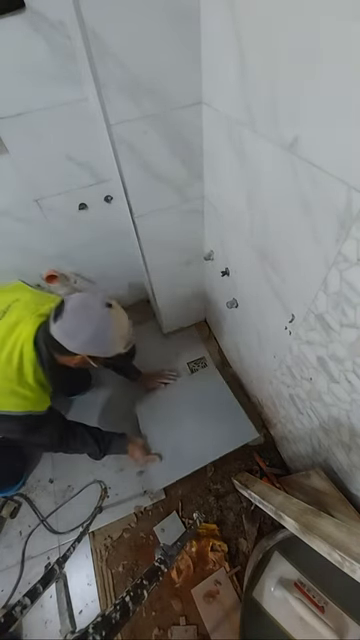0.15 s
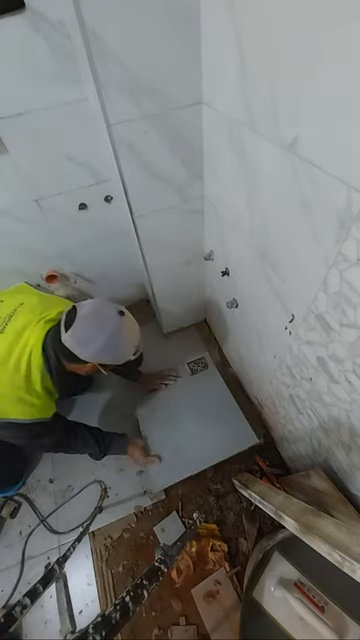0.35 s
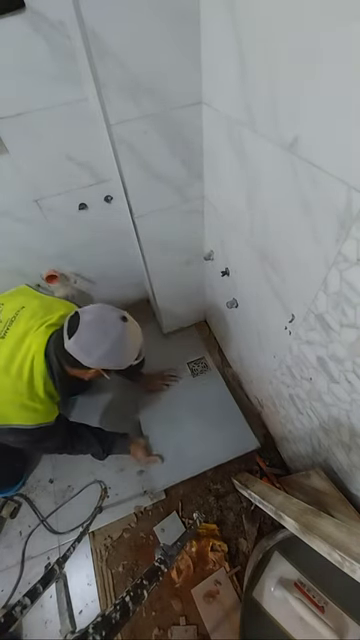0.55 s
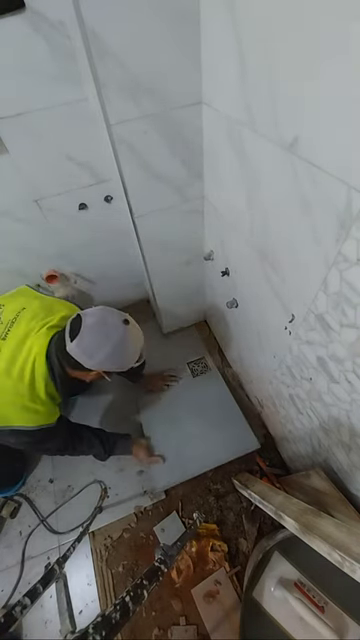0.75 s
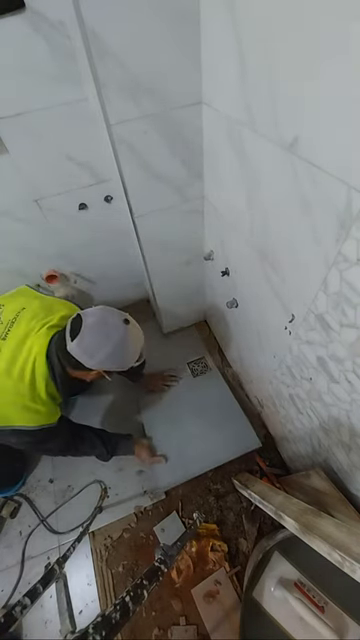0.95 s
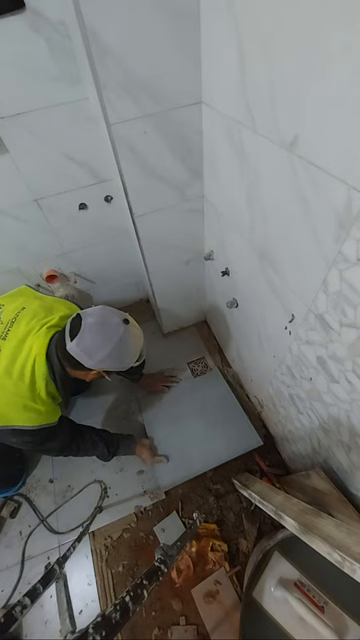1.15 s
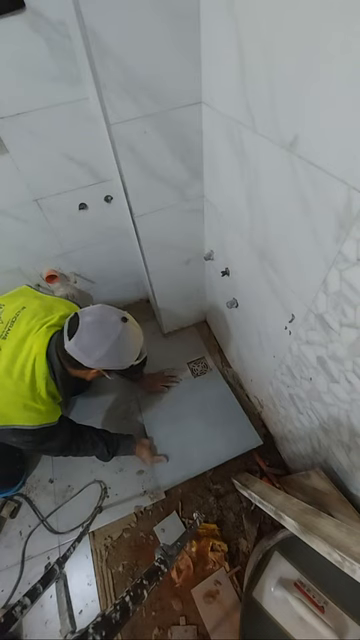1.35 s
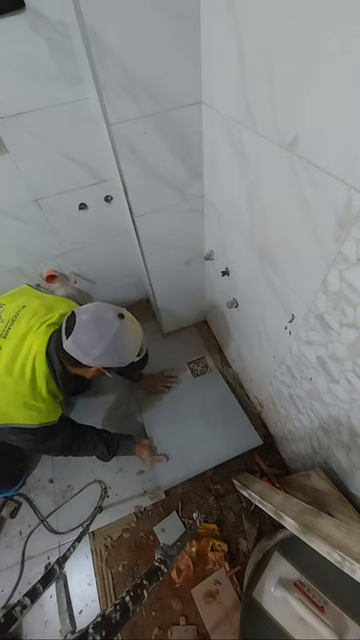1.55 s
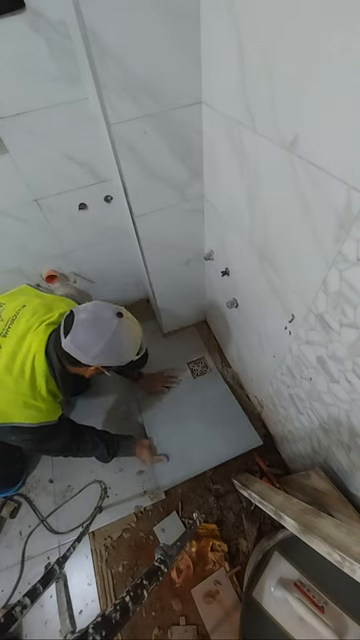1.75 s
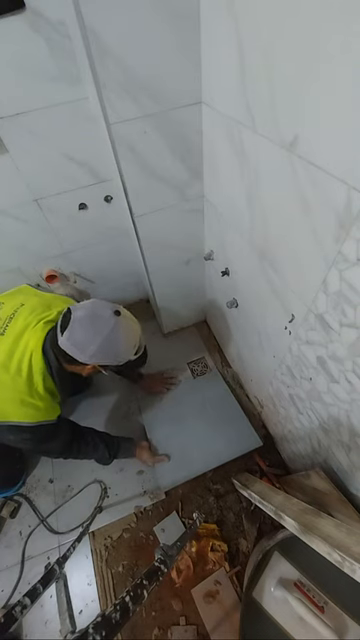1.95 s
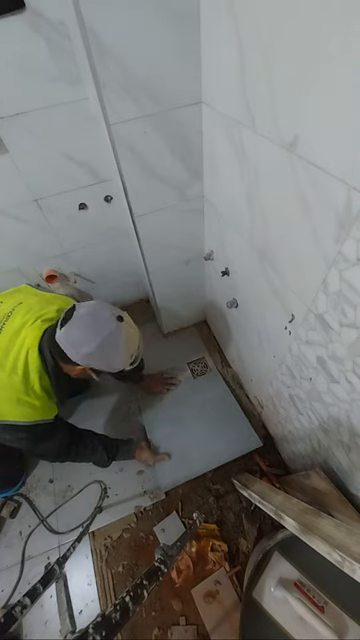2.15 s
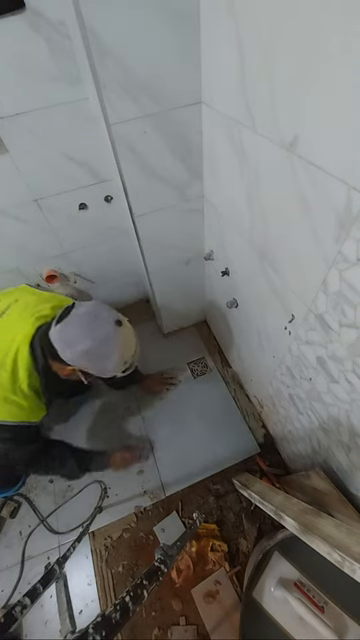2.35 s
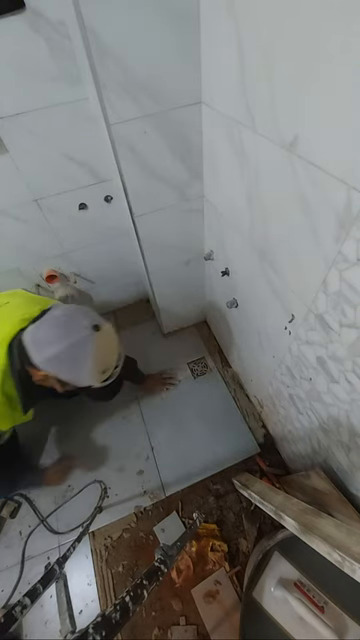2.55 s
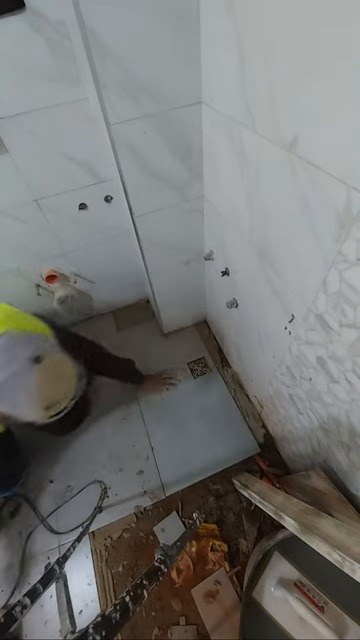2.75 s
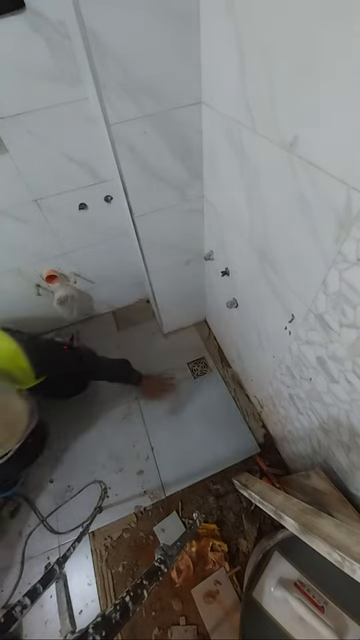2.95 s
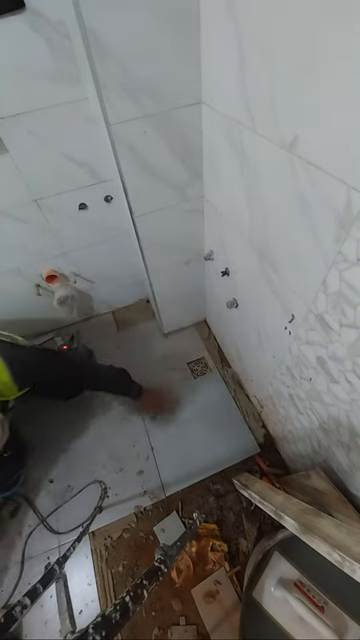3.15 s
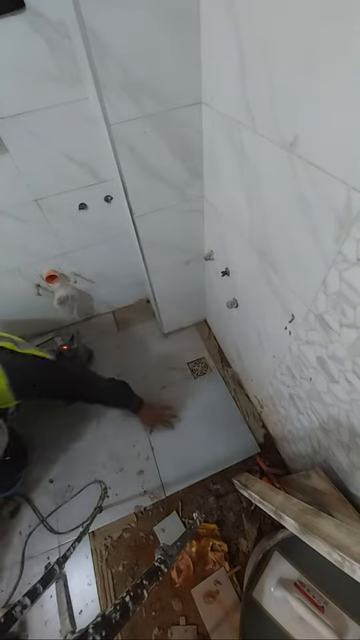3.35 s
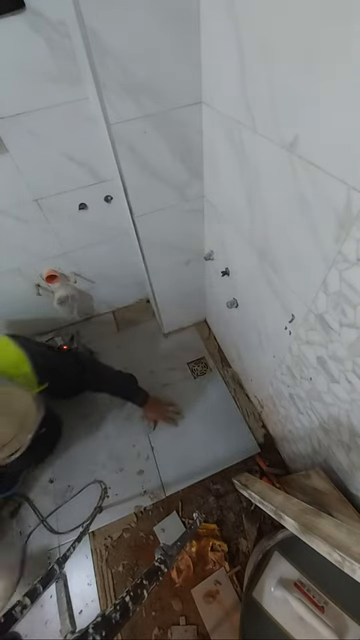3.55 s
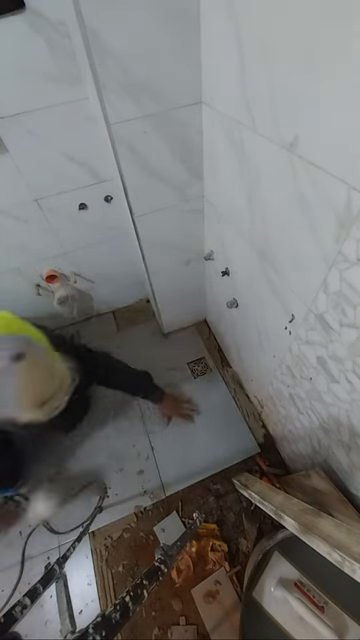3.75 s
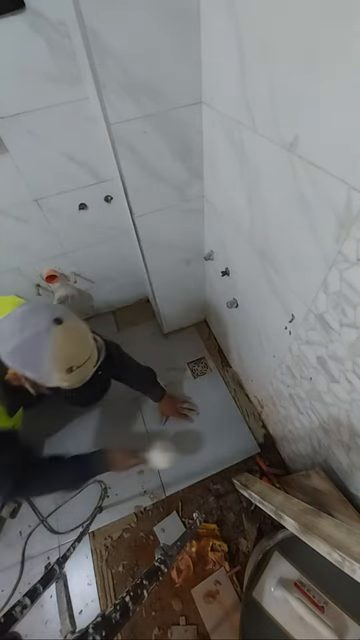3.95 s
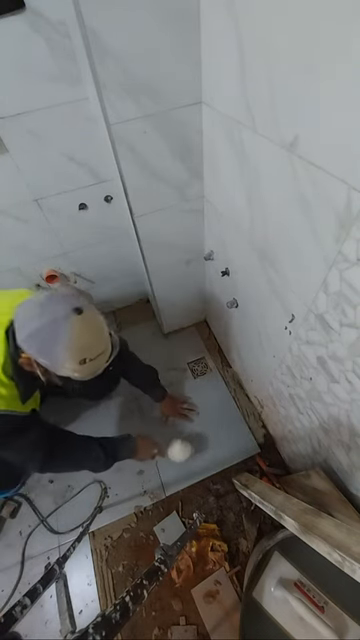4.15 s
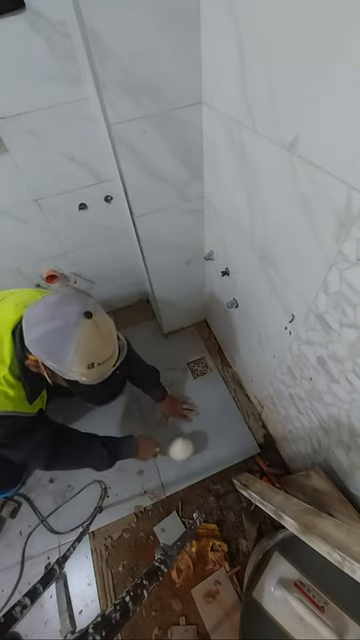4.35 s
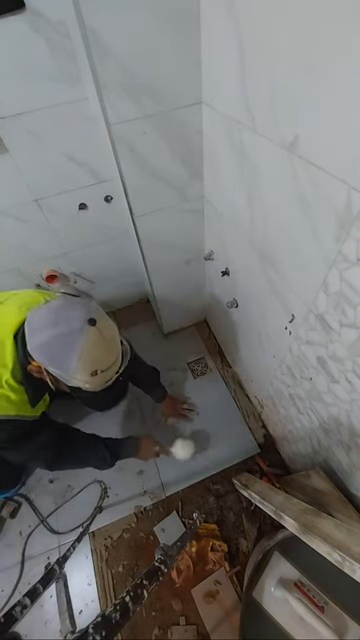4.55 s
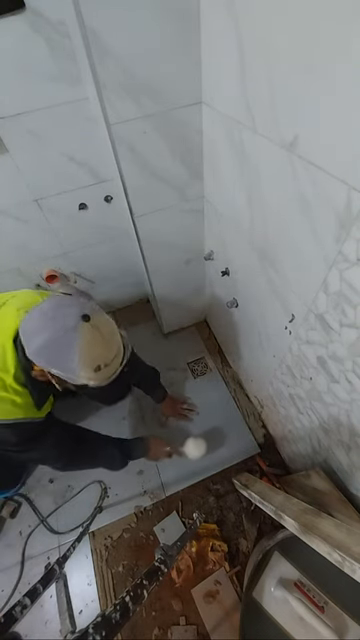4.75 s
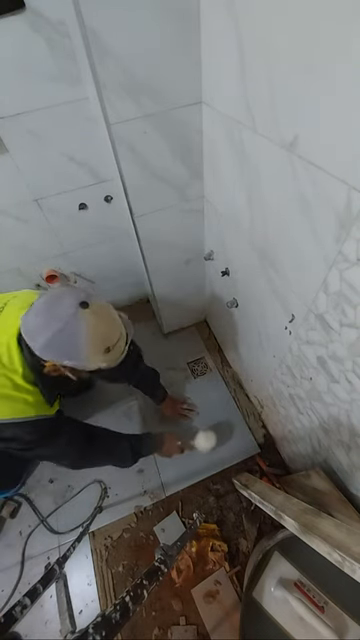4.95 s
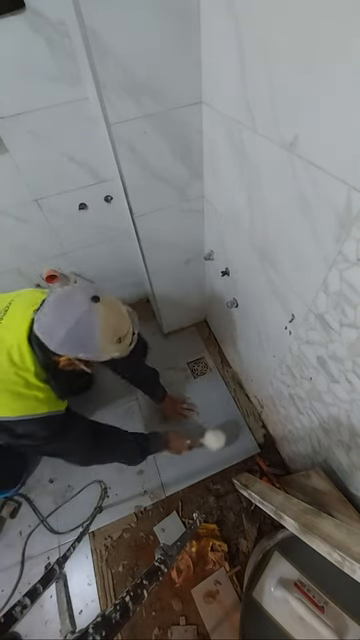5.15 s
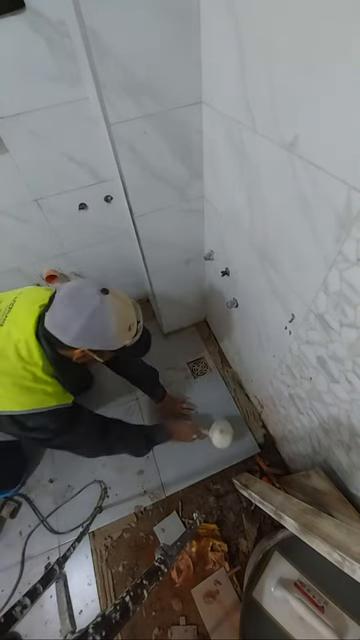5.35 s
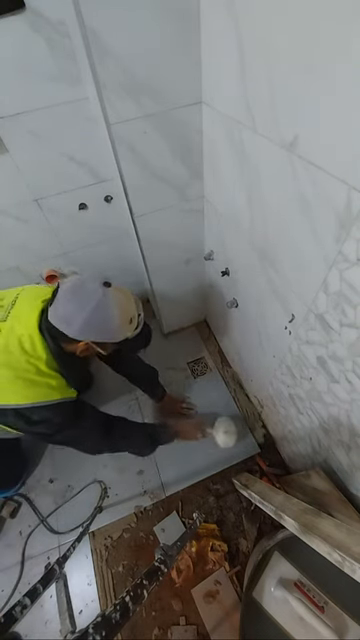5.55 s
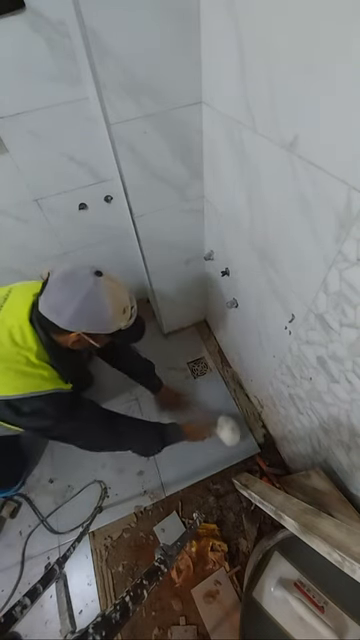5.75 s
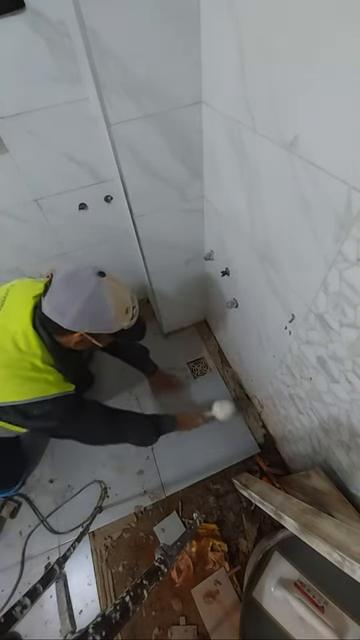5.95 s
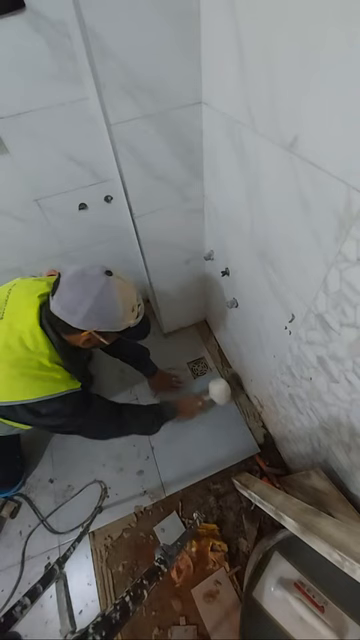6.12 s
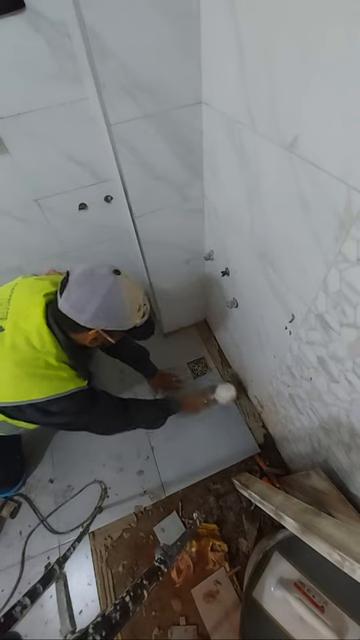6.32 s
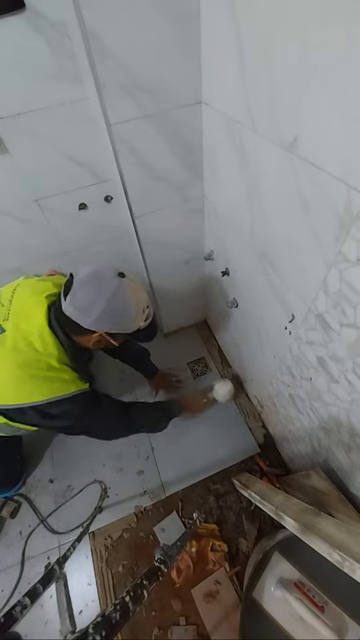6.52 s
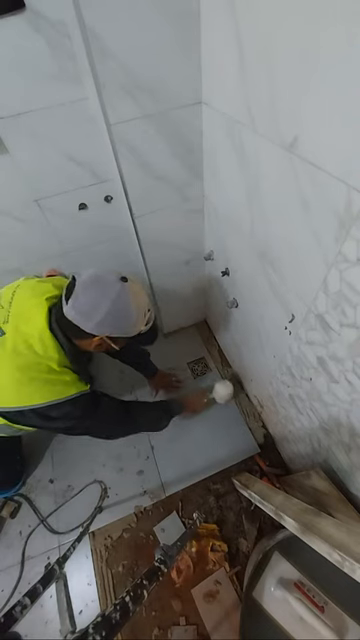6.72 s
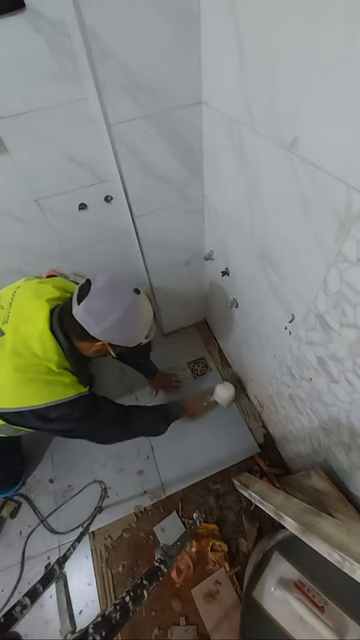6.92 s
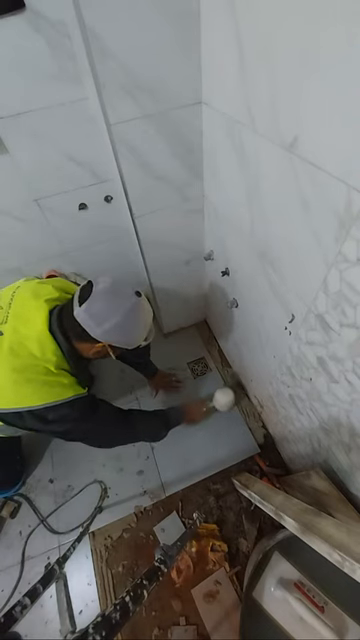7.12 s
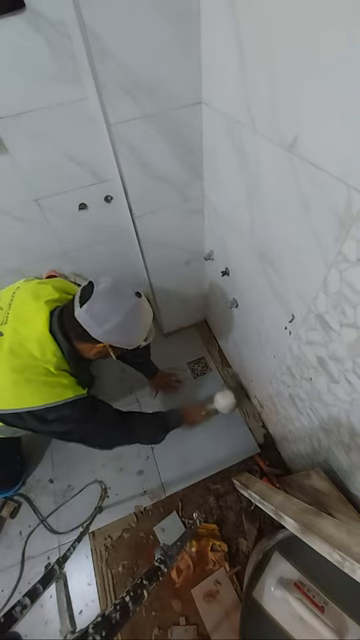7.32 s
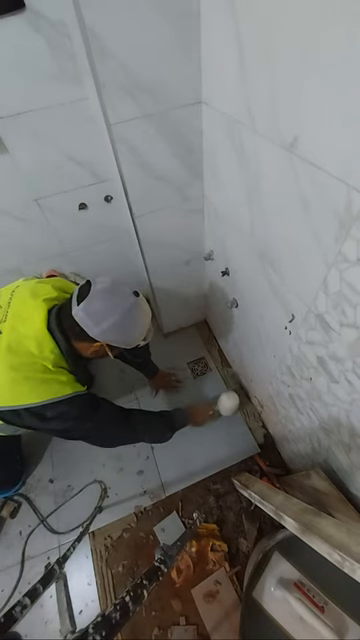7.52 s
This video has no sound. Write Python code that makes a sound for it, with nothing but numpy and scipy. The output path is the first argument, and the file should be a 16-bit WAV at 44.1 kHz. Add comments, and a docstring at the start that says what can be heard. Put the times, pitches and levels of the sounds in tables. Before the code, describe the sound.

In a small hard-walled bathroom, a tiler scrapes grit, shifts something with a thump, then beats a tile down with steady, hollow mallet blows.

```python
"""A tiler beds a ceramic floor tile in a small, bare, tiled bathroom, over hiss and a far drone that swells.
0.2-1.7 s: a tool scrapes the gritty joint (random slips of grit) and knocks; the tile judders, later groans.
2.2-2.5 s: something slides over the floor (slips again) and ends in a bump; work clothes rustle (filtered grains).
4.1-5.6 s and 6.0-7.6 s: two even runs of rubber-mallet taps, a soft push ringing tile and room resonances;
the room booms after each blow, and the sound drops out for an instant before the last."""
import sys
import numpy as np
from scipy import signal
from scipy.fft import rfft, irfft
from scipy.io import wavfile

SR = 44100
rng = np.random.default_rng(int(sys.argv[2]) if len(sys.argv) > 2 else 0)


def waveform_to_disk(signal):
    """Save audio, clipped to [-1, 1], as 16-bit WAV at the path in sys.argv[1]."""
    frames = np.transpose(np.atleast_2d(signal))
    scaled = np.clip(frames, -1, 1) * 32767
    samples = np.round(scaled).astype(np.int16)
    wavfile.write(sys.argv[1], SR, samples)


N = 338688
TIME = np.arange(N) / SR

# Levels of events and strokes are before the trims (*_trim_db) of their sources.
# Steady hiss: (frequency [Hz], density [dB per Hz, relative])
AIR_SPECTRUM = [(40, -25), (80, 4.5), (200, -3.5), (600, 5), (2000, -11), (4000, -11), (9000, -17),
                (16000, -9.5)]
AIR_DB = -63.5
# Far drone, holding its last level: (time [s], level [dB])
DRONE_LEVELS = [(0, -67), (.4, -61), (1.2, -52), (1.9, -53.5), (2.7, -52), (3.6, -52), (4.1, -52)]
# Drone colour: (frequency [Hz], density [dB per Hz, relative])
DRONE_SPECTRUM = [(100, -22), (300, -19.5), (450, -9), (600, -9), (800, -18.5), (1100, -5.5), (1500, -17),
                  (2100, -19), (3000, -65)]
# Drone resonances: (frequency [Hz], width [Hz], gain [dB])
DRONE_RESONANCES = [(627, 35, 19.6), (517, 90, 1.3)]

# Standing waves of the room: (frequency [Hz], level over direct sound [dB], t60 [s])
STANDING_WAVES = [(81, 21, 0.75), (104, 13, 0.45), (124, 18.5, 0.32), (162, 18, 0.52), (190, 19, 0.52),
                  (217, 10, 0.6), (242, 17.5, 0.4), (272, 17, 0.6), (287, 19, 0.19), (318, 23, 0.2),
                  (397, 9, 0.46), (422, 11, 0.3), (451, 2, 0.36), (495, 9, 0.95), (532, 1, 0.34),
                  (564, 9, 0.48), (634, 5, 0.46), (718, 16.5, 0.33), (917, 13.5, 0.45)]
# Diffuse reverberation: (frequency [Hz], level over direct sound [dB])
REVERB_LEVELS = [(100, -19), (450, -10), (750, 3), (1400, 5), (3000, 3), (7000, -1), (15000, -3)]
# Its decay: (frequency [Hz], t60 [s])
REVERB_T60 = [(500, 0.69), (1100, 0.42), (3000, 0.44), (7500, .35), (15000, 0.34)]
BUILD_UP_S, RECONTACT_DELAY_S = 0.0026, 0.0033

# Colour of cloth and fizz: (frequency [Hz], density [dB per Hz, relative])
CLOTH_SPECTRUM = [(1500, -11), (3000, -14.5), (5000, -10), (8000, -14), (11000, -5.5), (13500, -1.5),
                  (16000, -8)]
# Movements of the clothes: (middle [s], half length [s], level [dB])
CLOTH_MOVES = [(0.12, 0.18, -59), (0.45, 0.17, -55), (0.784, 0.11, -60), (1.92, .04, -64),
               (2.163, 0.023, -43.5), (2.25, 0.063, -46), (2.803, 0.061, -56), (2.966, 0.18, -64),
               (3.376, 0.051, -54), (3.55, 0.19, -67.5), (3.848, 0.086, -52.5), (5.693, 0.0052, -52),
               (5.857, 0.079, -44)]
# Short high fizz: cloth flicks at 0.73 and 3.04 s, bright top of the first three mallet taps:
# (time [s], level [dB])
FIZZES = [(0.73, -47), (3.035, -61), (4.077, -41), (4.31, -48.5), (4.525, -47.5)]
FIZZ_RISE_S, FIZZ_HOLD_S, FIZZ_FADE_DB_PER_S = 0.0031, 0.015, 400

# Gliding groans of rubbing: (time [s], length [s], first pitch [Hz], last pitch [Hz], level [dB])
RUB_GROANS = [(1.282, 0.14, 463, 404, -51), (1.448, 0.097, 357, 477, -52.5), (2.13, .18, 403.4, 577, -42)]
# Tool strokes along the joint: (time [s], length [s], scrape [dB], tile judder [dB], tile rocking [dB])
TOOL_STROKES = [(0.198, 0.069, -40, -58, -69), (0.254, 0.045, -36, -48, -67), (0.338, .05, -39, -45.5, -70),
                (0.366, 0.075, -37.5, -49.5, -67), (0.514, 0.025, -40, -72, -80),
                (0.6, 0.055, -46.5, -70, -77), (0.677, .06, -42, -60, -66), (0.743, 0.12, -41, -57, -58),
                (0.863, 0.077, -47.5, -75, -55), (0.97, 0.033, -41, -59, -54),
                (1.169, 0.015, -37.5, -55, -63), (1.354, 0.026, -41.5, -64, -74),
                (1.548, 0.057, -49.5, -77, -78), (1.638, .085, -50.5, -74, -72)]
BITE_S, EASE_DB_PER_S, SCRAPE_FADE_DB_PER_S, TILE_FADE_DB_PER_S = 0.016, 2, 175, 162
# Tile still settling at the outset: (time [s], length [s], level [dB])
TILE_SETTLING = (0.0, .02, -54)
# Scrape colour: (frequency [Hz], density [dB per Hz, relative])
GRIT_SPECTRUM = [(180, -41), (300, -21), (565, 11.5), (856, -6), (1060, 4), (1300, 0), (1810, -4.5),
                 (2790, -1.5), (15200, -22.5), (16000, -35)]
# Faint singing of the rubbed tile: (frequency [Hz], width [Hz], gain [dB])
RUB_RESONANCES = [(1068, 49, 7), (1483, 17, 14.5), (1760, 50, 18), (1880, 51, -2.5), (2557, 15, 9)]
# Two pushes of something over the floor: (middle [s], half length [s], level [dB])
FLOOR_PUSHES = [(2.252, 0.037, -31), (2.324, 0.022, -32.5)]
# Slide colour: (frequency [Hz], density [dB per Hz, relative])
SLIDE_SPECTRUM = [(71, -52), (120, -26), (231, -20.5), (340, -31), (529, 5), (667, -13.5), (1060, -3.5),
                  (1310, -12), (1780, -11), (2380, -16.5), (12000, -33), (15600, -66), (22000, -120)]

# Tile on its adhesive bed, thud then flex: (frequency [Hz], width [Hz])
TILE_RESONANCES = [(113, 63), (246, 121)]
KNOCK_WIDTH_HZ = 60
# Clack colour: (frequency [Hz], density [dB per Hz, relative])
CLACK_SPECTRUM = [(300, -25), (600, 10.5), (900, 7), (1300, 3), (1800, -2.5), (2600, -3), (4000, -14.5),
                  (8000, -50), (16000, -52.5)]
# Grit tick colour: (frequency [Hz], density [dB per Hz, relative])
TICK_SPECTRUM = [(800, -34), (2000, 5), (3200, 2.5), (4600, 1.5), (5700, -3.5), (6800, -2.5), (9000, -9.5),
                 (12000, -8), (16000, -13)]
# Hand and tool on the tile, and the bump: (time [s], thud [dB], flex [dB], knock [dB], knock pitch [Hz],
# clack [dB], clack pitch [Hz], grit tick [dB])
TOOL_KNOCKS = [(0.204, -51, -69, -56, 526, -46, 1730, -42.5),
               (0.261, -52, -60, -47.5, 535, -39.5, 1800, -35.5),
               (0.386, -61, -61, -47.5, 554, -46, 1500, -37.5),
               (1.178, -61, -52, -37.5, 585, -39.5, 1100, -44.5),
               (1.367, -57, -71, -47, 450, -50, 1090, -55), (1.557, -67, -76, -53, 567, -47, 1090, -52.5),
               (2.318, -21.5, -26.5, -22, 414, -26, 1180, -32.5),
               (2.453, -50, -56, -44, 437, -50, 990, -70)]
# Mallet taps, pitches following the struck spot: (time [s], thud [dB], flex [dB], knock [dB],
# knock pitch [Hz], clack [dB], clack pitch [Hz], grit tick [dB])
MALLET_TAPS = [(4.082, -14, -27.5, -22, 445, -26, 1690, -37), (4.317, -13, -23, -19, 405, -31.5, 1140, -48),
               (4.54, -11, -14.5, -17.5, 420, -29.5, 1040, -47),
               (4.781, -13.5, -7.5, -13, 379, -25, 750, -41.5),
               (4.987, -19.5, -9, -11.5, 389, -25.5, 800, -37.5),
               (5.181, -18.5, -16.5, -17, 366, -30.5, 700, -48),
               (5.386, -17.5, -22, -24, 452, -35, 950, -55), (5.589, -17, -26, -24, 445, -35.5, 990, -55),
               (6.018, -27, -8, -14.5, 494, -28, 1050, -35.5),
               (6.225, -23.5, -12, -10.5, 474, -34, 750, -34.5),
               (6.426, -29, -13, -11, 497, -16.5, 680, -30.5), (6.627, -26, -11, -10, 490, -21, 765, -29.5),
               (6.815, -25.5, -11.5, -11, 472, -27.5, 774, -43.5),
               (7.011, -38, -10.5, -12, 503, -19, 720, -26.5), (7.2, -25, -8, -12, 495, -20.5, 1230, -31.5),
               (7.394, -25.5, -8.5, -14.5, 489, -18, 1220, -23),
               (7.643, -22, -19.5, -22.5, 486, -33.5, 744, -46.5)]

# Instant of silence: (from [s], to [s])
SILENCE = (7.587, 7.622)
CUTOFF_HZ = 15900


def from_db(db):
    """Decibels to gain."""
    return 10 ** (np.asarray(db) / 20)


def rms_one(x):
    """Scale to unit rms."""
    return x / np.sqrt(np.mean(x ** 2) + 1e-20)


def at_hz(points, hz):
    """Read a table on a log-frequency axis."""
    f, value = np.transpose(points)
    return np.interp(np.log(np.maximum(hz, 1)), np.log(f), value)


def through(x, response):
    """Convolve, keeping the length."""
    return signal.fftconvolve(x, response)[:len(x)]


def colour(x, spectrum):
    """Causal minimum-phase filter, its phase found by folding the cepstrum."""
    size = 4096
    gain = from_db(at_hz(spectrum, np.fft.rfftfreq(size, 1 / SR)))
    cepstrum = irfft(np.log(gain))
    cepstrum[1:size // 2] *= 2
    cepstrum[size // 2 + 1:] = 0
    return through(x, irfft(np.exp(rfft(cepstrum))))


def resonate(x, hz, width_hz):
    """Two-pole resonance with gain 1 on top."""
    r = np.exp(-np.pi * width_hz / SR)
    zeros = np.array([1, 0, -1]) * (1 - r * r) / 2
    poles = [1, -2 * r * np.cos(2 * np.pi * hz / SR), r * r]
    return signal.lfilter(zeros, poles, x + 1e-18)


def with_modes(x, modes):
    """The sound plus the resonances that it excites."""
    return x + sum(from_db(db) * resonate(x, hz, width_hz) for hz, width_hz, db in modes)


def lowpass(x, hz):
    """Second-order low-pass."""
    return signal.sosfilt(signal.butter(2, hz, fs=SR, output="sos"), x)


def add(out, s, sound):
    """Mix a sound in at time s."""
    start = max(round(s * SR), 0)
    out[start:start + len(sound)] += sound[:max(N - start, 0)]


def gesture(s, length_s, attack_s, fade_db_per_s):
    """Gain over time: a quick attack, a hold that eases off, then a release."""
    age_s = np.maximum(TIME - s, 0)
    fall_db = EASE_DB_PER_S * age_s + fade_db_per_s * np.maximum(age_s - length_s, 0)
    return np.minimum(age_s / attack_s, 1) * from_db(-np.minimum(fall_db, 200))


def swell(middle_s, half_s):
    """Gain over time of a smooth movement: a bell with long skirts."""
    return 1 / (1 + .5 * ((TIME - middle_s) / half_s) ** 2) ** 2


def together(gains):
    """Unrelated sounds add in power."""
    return np.sqrt(sum(gain ** 2 for gain in gains))


def grains(per_s, spread_db):
    """Random tiny slips of uneven size, rms 1."""
    size_db = spread_db * np.minimum(rng.exponential(1, N), 4)
    sizes = from_db(size_db) * rng.choice([-1, 1], N)
    return rms_one(sizes * (rng.random(N) < per_s / SR))


def reverberation():
    """Countless wall reflections; drawn once for the room and anew for the crushed grit of each blow."""
    t, out = TIME[:SR], np.zeros(SR)
    edges_hz = np.geomspace(100, 18000, 22)
    white = rng.standard_normal((2, SR))
    for k, (low_hz, high_hz) in enumerate(zip(edges_hz, edges_hz[1:])):
        hz = np.sqrt(low_hz * high_hz)
        decay_per_s = np.log(1000) / at_hz(REVERB_T60, hz)  # the treble dies sooner than the bass
        band_filter = signal.butter(2, [low_hz, high_hz], "band", fs=SR, output="sos")
        band = signal.sosfilt(band_filter, white[k % 2])  # neighbouring bands stay independent
        level = from_db(at_hz(REVERB_LEVELS, hz)) * np.sqrt(2 * decay_per_s / SR)
        out += level * band * np.exp(-decay_per_s * t)
    return out * (1 - np.exp(-t / BUILD_UP_S))


def bathroom():
    """One second of room response: direct sound, standing waves and reverberation."""
    t, response = TIME[:SR], reverberation()
    response[0] += 1
    for k, (hz, db, t60_s) in enumerate(STANDING_WAVES):
        decay_per_s = np.log(1000) / t60_s
        level = (-1) ** k * from_db(db) * 2 * decay_per_s / SR  # signs alternate
        response += level * np.exp(-decay_per_s * t) * np.cos(2 * np.pi * hz * t)
    return response


def background():
    """A far drone of resonant noise, muffled by the building, over faint hiss."""
    drone = with_modes(colour(rng.standard_normal(N), DRONE_SPECTRUM), DRONE_RESONANCES)
    drone = lowpass(drone, 3000)
    drone_gain = from_db(np.interp(TIME, *np.transpose(DRONE_LEVELS)))
    hiss = rms_one(colour(rng.standard_normal(N), AIR_SPECTRUM))
    return drone_gain * rms_one(drone) + from_db(AIR_DB) * hiss


def clothes_and_fizz():
    """Dense grains hiss finely: synthetic cloth sliding over itself, and the bright top of three taps."""
    hiss = rms_one(colour(grains(per_s=12000, spread_db=3.0), CLOTH_SPECTRUM))
    rustles = [from_db(db) * swell(s, half_s) for s, half_s, db in CLOTH_MOVES]
    fizzes = [from_db(db) * gesture(s, FIZZ_HOLD_S, FIZZ_RISE_S, FIZZ_FADE_DB_PER_S)
              for s, db in FIZZES]
    return together(rustles + fizzes) * hiss


def groans(width_hz=35):
    """Uneven stick and slip whose rate follows the speed of the rubbing: a gliding, wobbling tone."""
    out = np.zeros(N)
    for s, length_s, first_hz, last_hz, db in RUB_GROANS:
        count = int(length_s * SR)
        phase = 2 * np.pi * np.cumsum(np.linspace(first_hz, last_hz, count)) / SR
        wobble = lowpass(rng.standard_normal((2, N)), width_hz)[:, -count:]
        tone = rms_one(wobble[0] * np.cos(phase) + wobble[1] * np.sin(phase))
        add(out, s, from_db(db) * np.hanning(count) * tone)
    return out


def creep(jerks, hz, width_hz):
    """Jerks through two tile resonances in a row, rms 1."""
    return rms_one(resonate(resonate(jerks, hz, width_hz), hz, 2 * width_hz))


def pressing(trim_db=-0.5):
    """Under each stroke the tile creeps on the adhesive in small jerks, with a low grumble."""
    jerks = grains(per_s=490, spread_db=1.0)
    judder = creep(jerks, hz=222, width_hz=55)
    rock = creep(jerks, hz=82, width_hz=30)
    judder_gains, rock_gains = [], []
    for s, length_s, _, judder_db, rock_db in TOOL_STROKES:
        stroke = gesture(s, length_s, BITE_S, TILE_FADE_DB_PER_S)
        judder_gains.append(from_db(judder_db) * stroke)
        rock_gains.append(from_db(rock_db) * stroke)
    s, length_s, db = TILE_SETTLING
    settling = from_db(db) * gesture(s, length_s, BITE_S, TILE_FADE_DB_PER_S)
    return from_db(trim_db) * ((together(judder_gains) + settling) * judder + together(rock_gains) * rock)


def scraping(room, dry_share=0.1, scrape_trim_db=-0.5):
    """Sand grains slip under the tool, and under the floor slide; the hard walls smear each of them."""
    slips = grains(per_s=350, spread_db=1.5)
    slips = rms_one(through(slips, room)) + dry_share * slips
    effort = together(from_db(db) * gesture(s, length_s, BITE_S, SCRAPE_FADE_DB_PER_S)
                      for s, length_s, db, _, _ in TOOL_STROKES)
    grit = rms_one(with_modes(colour(slips, GRIT_SPECTRUM), RUB_RESONANCES))
    pushes = together(from_db(db) * swell(s, half_s) for s, half_s, db in FLOOR_PUSHES)
    slide = rms_one(colour(slips, SLIDE_SPECTRUM))
    return from_db(scrape_trim_db) * effort * grit + pushes * slide


def loud_as(db, sound):
    """Set the rms level of the first 50 ms of a blow."""
    return from_db(db) * sound / np.sqrt(np.mean(sound[:SR // 20] ** 2))


def crunch(length_s, recontact_share=0.54):
    """A burst of crushed grit that swells with the push, a second burst as tile and grit touch again, and its
    reverberation."""
    age = TIME[:SR] / length_s
    recontact_age = np.maximum(age - RECONTACT_DELAY_S / length_s, 0)
    power = age * np.exp(-age) + recontact_share * recontact_age * np.exp(-recontact_age)
    return rng.standard_normal(SR) * np.sqrt(power / power.sum()) + reverberation()


def blows(table, room, contact_s, crush_s, body_trim_db, clack_trim_db, tick_trim_db):
    """A soft push bends the tile on its bed; its edge clacks and grit is crushed under it."""
    t, out = TIME[:SR], np.zeros(N)
    push = through(t / contact_s * np.exp(-t / contact_s), room)
    thud, flex = [resonate(push, hz, width_hz) for hz, width_hz in TILE_RESONANCES]
    for s, thud_db, flex_db, knock_db, knock_hz, clack_db, clack_hz, tick_db in table:
        knock = resonate(push, knock_hz, KNOCK_WIDTH_HZ)
        body = loud_as(thud_db, thud) + loud_as(flex_db, flex) + loud_as(knock_db, knock)
        # the room answers alike on every blow, the grit is new each time
        grit = crunch(crush_s)
        clack = colour(0.53 * room + grit, CLACK_SPECTRUM)
        clack = with_modes(clack, [(clack_hz, 300, 3.0)])  # edge: Hz, width Hz, dB
        tick = colour(grit, TICK_SPECTRUM)
        sound = from_db(body_trim_db) * body
        sound += loud_as(clack_db + clack_trim_db, clack)
        sound += loud_as(tick_db + tick_trim_db, tick)
        add(out, s, sound)
    return out


def scene():
    """All sources together, from the background to the mallet."""
    room = bathroom()
    friction = clothes_and_fizz() + groans() + pressing() + scraping(room)
    knocks = blows(TOOL_KNOCKS, room, contact_s=0.00013, crush_s=0.0021,
                   body_trim_db=-6.5, clack_trim_db=-6.5, tick_trim_db=-4.0)
    mallet = blows(MALLET_TAPS, room, contact_s=0.0003, crush_s=0.0011,
                   body_trim_db=-3.0, clack_trim_db=-2.5, tick_trim_db=-1.0)
    return (background() + friction + knocks + mallet)[None]


def record(dry):
    """Deep bass is lost, the loudest peaks are rounded, the sound drops out for an instant and the top is cut."""
    x = signal.sosfilt(signal.butter(2, 62, "high", fs=SR, output="sos"), dry)
    x = x / (1 + x ** 6) ** (1 / 6)
    x = x * ((TIME < SILENCE[0]) | (TIME > SILENCE[1]))
    return signal.sosfilt(signal.ellip(10, .1, 80, CUTOFF_HZ, fs=SR, output="sos"), x)


dry = scene()
out = record(dry)
waveform_to_disk(out)
```